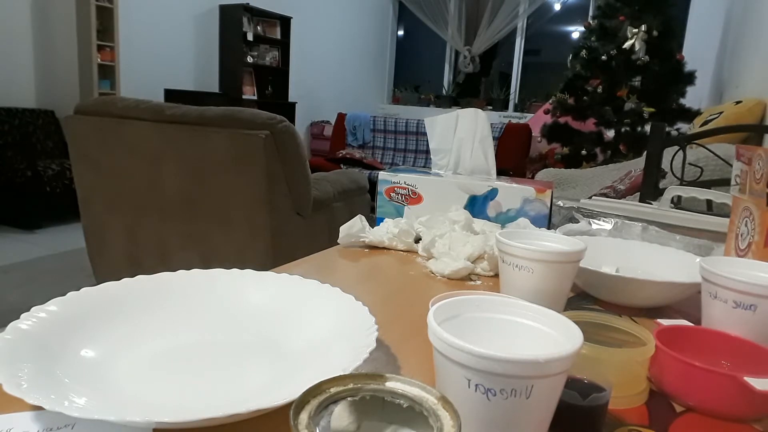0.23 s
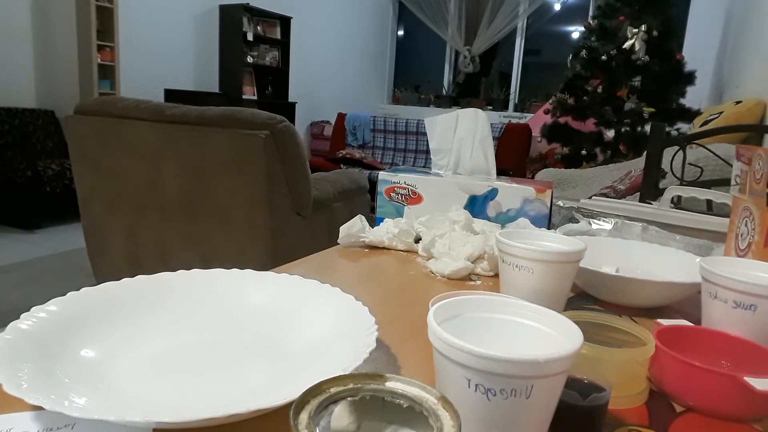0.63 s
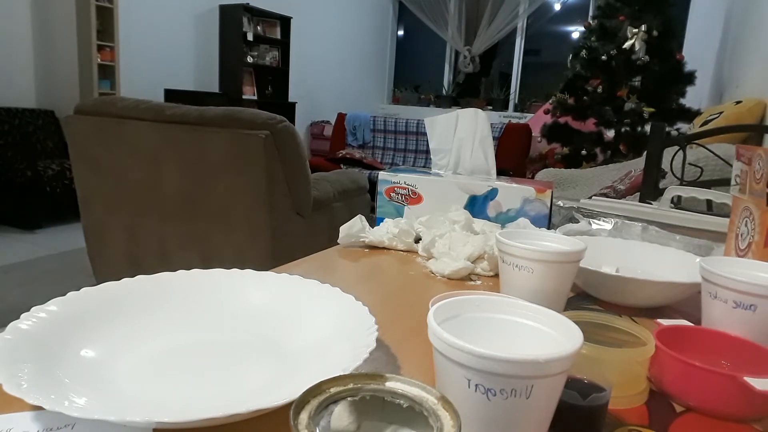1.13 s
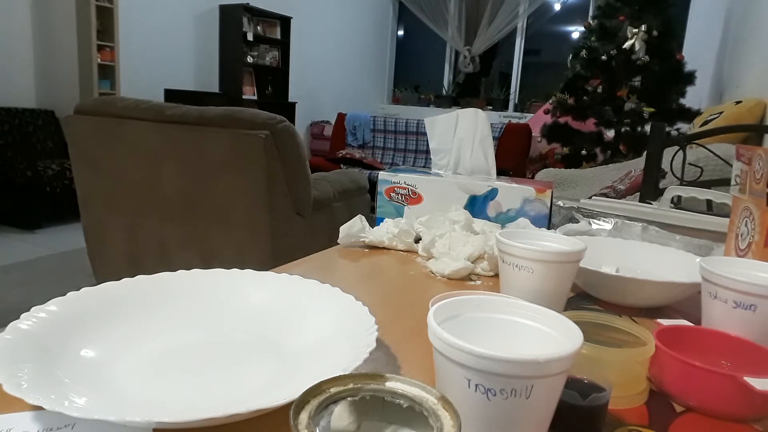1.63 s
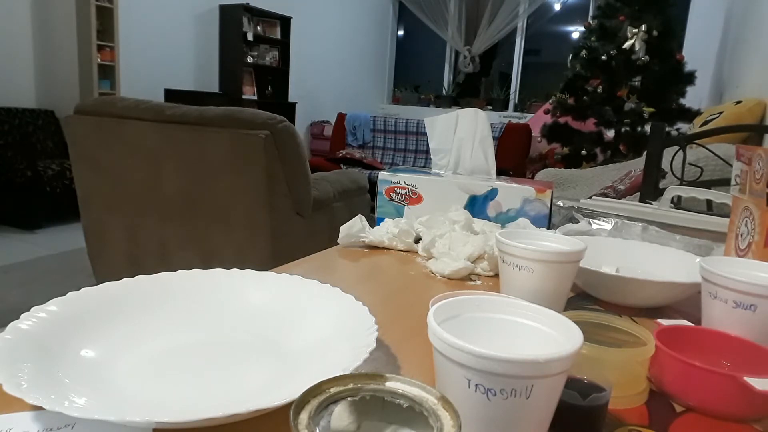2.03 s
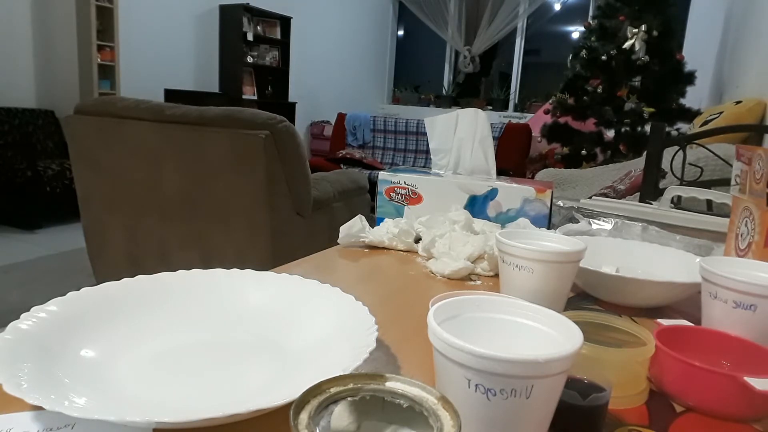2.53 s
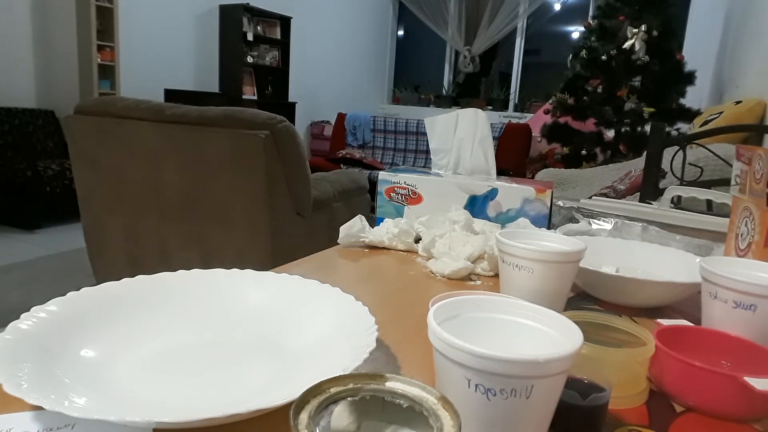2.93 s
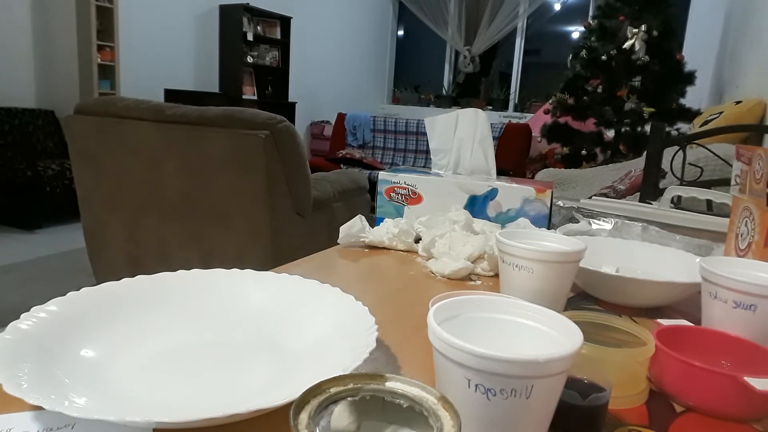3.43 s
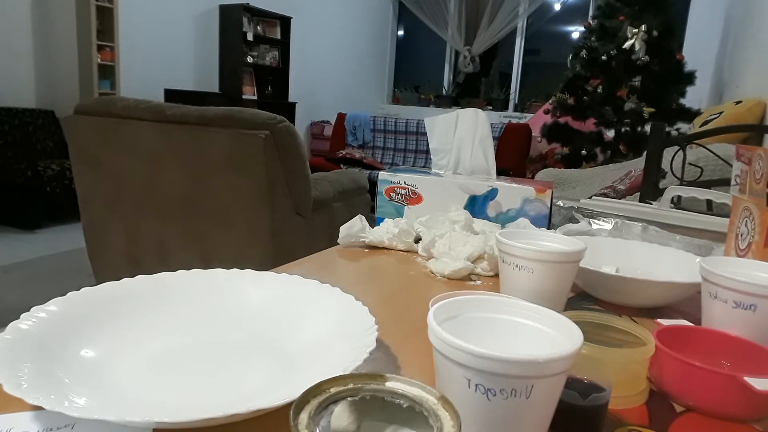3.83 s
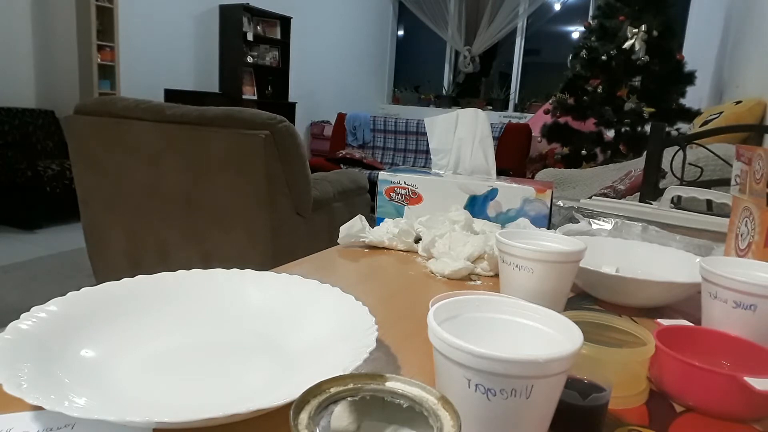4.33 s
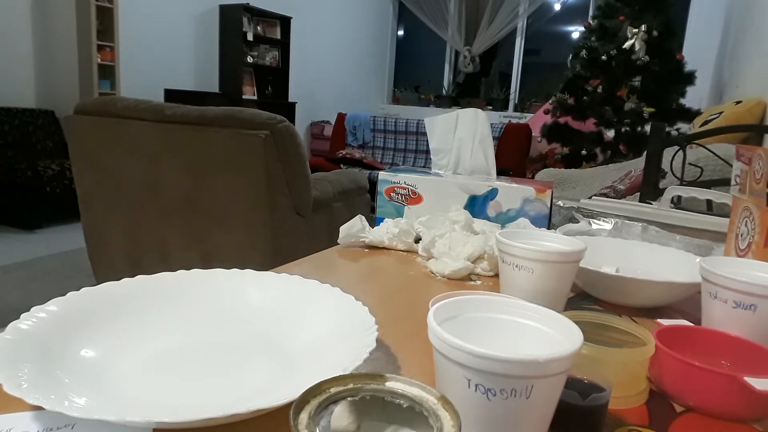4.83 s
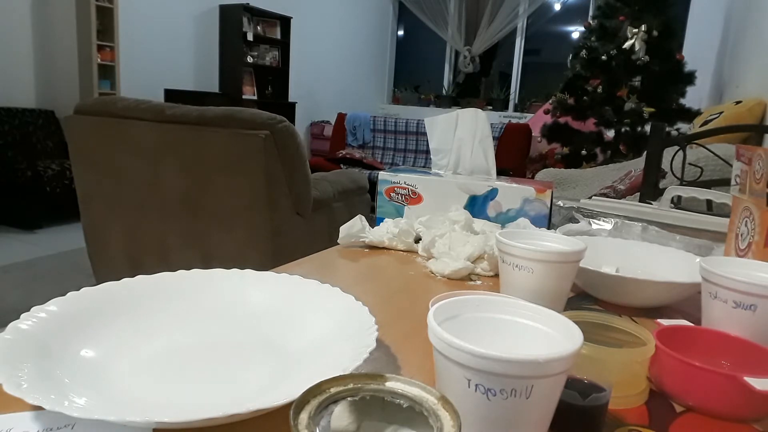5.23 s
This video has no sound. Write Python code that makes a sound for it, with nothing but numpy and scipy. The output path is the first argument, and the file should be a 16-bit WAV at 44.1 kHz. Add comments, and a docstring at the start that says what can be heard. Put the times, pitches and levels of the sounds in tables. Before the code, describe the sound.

In a quiet, hard-floored living room with low ventilation rumble, faint squeaks and small metal latch clicks with soft thuds come first. A door then slams sharply, booming through the room. Slippered steps follow, slapping and scuffing slowly to the end, with one small hollow knock close by. A stationary phone on a table hears the door and walker at a distance, in mono with slight hiss.

```python
"""A door is slammed across a hard-floored living room: dulling blows, a panel of damped modes and a boom.
Before it, steel latch parts chatter and ring and soft thuds fall; a small hollow thing knocks after it.
Slippers shuffle: each step is slaps, made of tiny contacts, and scuffs, made of slips through a resonance.
Faint squeaks stick and slip, and clothes rustle as fluttering noise. The room answers each contact with
reflections and a tail, over ventilation: a noise rumble with wavering tones."""
import sys
import numpy as np
from scipy import signal
from scipy.fft import rfft, irfft, next_fast_len
from scipy.io import wavfile
from scipy.ndimage import map_coordinates

SR = 44100
rng = np.random.default_rng(int(sys.argv[2]) if len(sys.argv) > 2 else 0)


def bounce(signal):
    """Save signal as a 16-bit WAV file at the path given by the first command-line argument."""
    frames = np.transpose(np.atleast_2d(signal))
    limited = np.clip(frames, -1, 1)
    pcm = np.round(limited * 32767).astype(np.int16)
    wavfile.write(sys.argv[1], SR, pcm)


N = 241957  # length of the scene in samples
T = np.arange(SR) / SR  # each short sound is built on one second of time [s]
HZ = np.fft.rfftfreq(SR, 1 / SR)

# Steps, one foot rolling down slowly and the other almost flat:
# (heel lands [s], sole lands [s], skim before the heel [s], drag after the sole [s],
#  relative heel level [dB], relative sole level [dB], slide level [dB], drag level [dB],
#  slap brightness [dB per octave])
FOOTSTEPS = [(2.211, 2.349, 0.0033, 0.099, -37, -40, -61.5, -54.5, 2),
             (2.772, 2.837, 0.01, 0.14, -55, -31, -57, -53.5, -0.3),
             (3.256, 3.383, 0.1, 0.15, -36.5, -27.5, -47.5, -56.5, 2.5),
             (3.873, 3.909, 0.11, 0.12, -41.5, -30, -53, -50.5, 0.9),
             (4.289, 4.412, 0.071, 0.15, -30.5, -31.5, -47.5, -49, 2.3),
             (4.944, 4.977, 0.057, 0.15, -40.5, -33.5, -50.5, -47.5, -2.5),
             (5.412, 5.54, 0.01, 0.13, -40.5, -35, -54.5, -48, 0.5)]
# Colour of a soft heavy bump: (frequency [Hz], relative level [dB])
BUMP_COLOUR = [(29, -43), (50, -18), (81, -5), (199, -3.5), (257, -8.5), (377, -1), (447, -16.5),
               (578, -15.5), (630, -18), (1500, -27), (1950, -56), (3300, -120)]
# Colour of the slipper sole's rub, also lent to the fabric: (frequency [Hz], relative level [dB])
SOLE_COLOUR = [(310, -22.5), (520, -3), (739, -2.5), (1180, 1), (1580, -2.5), (2150, -2.5), (2310, -2.5),
               (3240, -4.5), (3670, -6), (4000, -7), (6180, -13.5), (9560, -13.5), (10900, -23),
               (15000, -21.5)]
LIGHT_HZ, LOADED_HZ, LIFTING_HZ = 2020, 1070, 2600  # sole resonance: first touch, full weight, lift-off


def amp(db):
    """Turn decibels into a linear gain."""
    return 10 ** (np.asarray(db) / 20)


def unit(x):
    """Scale to an rms of 1."""
    return x / np.sqrt(np.mean(x ** 2) + 1e-20)


def unit_energy(x):
    """Scale to an energy of 1."""
    return x / np.sqrt(np.sum(x ** 2) + 1e-20)


def along(points, hz):
    """Read a curve of (Hz, value) points on a log frequency axis."""
    point_hz, values = np.transpose(points)
    return np.interp(np.log(hz + 1), np.log(point_hz + 1), values)


def fade(t60):
    """An exponential decay of 60 dB in t60 seconds."""
    return np.exp(-np.log(1000) * T / np.maximum(t60, 1e-4))


def wobble(rate):
    """A smooth random curve through rate knots a second."""
    knots = rng.standard_normal(int(N * rate / SR) + 4)
    return map_coordinates(knots, [np.arange(N) * rate / SR])


def add(track, s, sound):
    """Mix a sound into the track at time s."""
    start = round(s * SR)
    part = sound[:max(N - start, 0)]
    track[start:start + len(part)] += part


def colour(spectrum, bright=0):
    """A spectrum in dB, tilted about 2 kHz by bright dB per octave: harder contact is brighter."""
    return along(spectrum, HZ) + bright * np.log2(np.clip(HZ, 400, 9000) / 2000)


def pulse(colour_db):
    """The causal click that has this colour, folded to minimum phase; energy 1."""
    cepstrum = irfft(np.log(amp(colour_db - colour_db.max()) + 1e-6), SR)
    cepstrum[1:SR // 2] *= 2
    cepstrum[SR // 2 + 1:] = 0
    return unit_energy(irfft(np.exp(rfft(cepstrum)), SR))


def ring(modes, t60_at_1k, slope):
    """Damped modes, the higher ones shorter, at slightly new strengths for each blow; energy 1."""
    total = np.zeros(SR)
    for hz, db in modes:
        decay = fade(t60_at_1k * (hz / 1000) ** -slope)
        total += amp(db + rng.normal(0, 1.0)) * decay * np.sin(2 * np.pi * (hz * T + rng.random()))
    return unit_energy(total)


def in_room(sound, early_db, early_t60, direct):
    """Direct sound, sparse early reflections and a diffuse tail, drawn anew for each sound."""
    # Decay of the room: (frequency [Hz], 60 dB decay time [s])
    room_decay = [(60, 0.84), (150, 1), (300, 0.78), (1000, 0.72), (3000, 0.63), (5500, 0.64), (9000, 0.43),
                  (14000, 0.28)]
    hz, t, z = signal.stft(rng.standard_normal(SR), SR, nperseg=256)
    decay = np.exp(-np.log(1000) * t / along(room_decay, hz)[:, None])
    tail = signal.istft(z * decay, SR, nperseg=256)[1][:SR]
    tail = unit_energy(tail * (1 - fade(0.037)))  # the tail builds up gradually
    early = unit_energy(rng.standard_normal(SR) * (rng.random(SR) < .08) * fade(early_t60))
    early[0] += direct
    response = unit_energy(tail + amp(early_db) * unit_energy(early))
    return signal.fftconvolve(sound, response)[:SR]


def strike(sound, db):
    """Scale a hit by its first 1/80 s so that its attack peaks near db."""
    attack = sound[:SR // 80]
    return amp(db - 10) * sound / np.sqrt(np.mean(attack ** 2))  # allows 10 dB from rms to peak


def noise(spectrum):
    """Steady noise of rms 1 with this spectrum."""
    shape = amp(along(spectrum, np.fft.rfftfreq(N, 1 / SR)))
    return unit(irfft(rfft(rng.standard_normal(N)) * shape, N))


def door(ring_level_db=-23, early_db=-2, boom_db=-3, count=3):
    """The leaf lands along the frame in quick, ever duller blows; its panel rings and the room booms."""
    # The leaf's broad knock: (frequency [Hz], relative level [dB])
    leaf_colour = [(140, -48), (230, -14), (320, -3.5), (483, -7.5), (880, -3.5), (967, -8), (1110, -3.5),
                   (1820, -8), (2230, -9), (2610, -16), (3260, -9), (4330, -29), (6430, -58), (6960, -43),
                   (10000, -26.5), (13000, -68), (22000, -120)]
    # The leaf's ringing modes: (frequency [Hz], relative level [dB])
    panel_modes = [(323.0, -37.5), (425.3, -38.5), (586.8, -41), (759.0, -56), (866.7, -42), (909.8, -53),
                   (1050, -48), (1114, -44), (1233, -49), (1480, -47), (1545, -47), (1615, -65),
                   (1642, -42), (1674, -47), (1739, -50), (1927, -53), (2105, -52), (2342, -54),
                   (2396, -55), (2977, -50), (3241, -59), (3354, -64), (3612, -44.5), (3876, -63)]
    # The air that the leaf pushes into the room: (frequency [Hz], relative level [dB])
    boom_colour = [(32, -31), (52, -14), (64, 3), (81, -0.5), (113, -5.5), (145, 6), (178, -11.5),
                   (230, 4.5), (300, -42), (510, -120)]
    slam_s, slam_db, slam_bright = 1.809, -16.5, 0.47  # first blow: s, dB, dB per octave
    gap_s, loss_db, dulling = 0.0076, 2, 1.0  # per further blow: s later, dB weaker, dB per octave duller
    out = np.zeros(N)
    for k in range(count):
        blow = pulse(colour(leaf_colour, slam_bright - k * dulling))
        blow = in_room(blow, early_db, early_t60=0.13, direct=0.044)
        add(out, slam_s + k * gap_s, strike(blow, slam_db - k * loss_db))
    swell = 1 - fade(0.049)  # the blow takes a moment to spread through the panel
    add(out, slam_s, swell * strike(ring(panel_modes, t60_at_1k=0.7, slope=0.042), ring_level_db))
    boom = in_room(pulse(colour(boom_colour)), early_db=-4, early_t60=0.33, direct=.05)
    add(out, slam_s, amp(boom_db) * unit_energy(boom))
    return out


def latch(early_db=0):
    """Steel parts chatter in the lock; harder strikes are brighter and leave more of a thin ring."""
    # Handle and latch contacts: (time [s], level [dB], chatter length [s])
    latch_contacts = [(1.196, -45, 0.03), (1.463, -48.5, 0.092), (1.533, -49.5, 0.036), (1.549, -40, 0.017),
                      (1.568, -37.5, 0.0084), (1.792, -24, 0.032), (1.8068, -20.5, 0.0098)]
    # A latch click: (frequency [Hz], relative level [dB])
    steel_colour = [(180, -45), (300, 3.5), (907, -9), (1590, -2), (2210, 0.5), (3130, -2.5), (3400, -7),
                    (3690, 0), (4720, -9.5), (5300, -9), (5950, -10), (6680, -11), (8560, -10.5),
                    (11300, -28.5), (15500, -29)]
    # The lock's ringing modes: (frequency [Hz], relative level [dB])
    lock_modes = [(4587, -66), (5383, -58), (5825, -63), (6105, -69), (6842, -51), (6977, -55), (7036, -63),
                  (8355, -72)]
    firm_db, firm_ring_db = -34, -22  # a firm contact: its level, and its ring relative to the click
    brightens, ring_grows = 0.19, 0.41  # per dB harder than that: dB per octave brighter, dB more ring
    out = np.zeros(N)
    for s, db, spread in latch_contacts:
        force_db = db - firm_db
        click = chatter(colour(steel_colour, brightens * force_db), spread)
        click = in_room(click, early_db, early_t60=0.092, direct=0.18)
        ring_gain = amp(firm_ring_db + ring_grows * force_db)
        ringing = ring_gain * ring(lock_modes, t60_at_1k=0.73, slope=0.17)
        add(out, s, strike(unit_energy(click) + ringing, db))
    return out


def chatter(colour_db, spread, follow_db=0):
    """Two surfaces meet: one contact, then a run of tiny ones that dies within spread seconds."""
    contacts = rng.standard_normal(SR) * (rng.random(SR) < .3) * fade(spread)
    contacts = amp(follow_db) * unit_energy(contacts)
    contacts[0] += 1
    return unit_energy(signal.fftconvolve(contacts, pulse(colour_db))[:SR])


def slaps(level_db=-2, weight_db=-12, early_db=1.5):
    """Heel, then sole smack the hard floor, with a soft thump from the walker's weight."""
    # A slipper slap: (frequency [Hz], relative level [dB])
    slap_colour = [(240, -14), (400, -14.5), (784, -11), (1070, 5), (1300, -4), (1910, 0), (3910, -1.5),
                   (4290, -4), (4630, -7), (9350, -14.5), (10600, -22), (15500, -32)]
    out = np.zeros(N)
    for heel_s, sole_s, _, _, heel_db, sole_db, _, _, bright in FOOTSTEPS:
        for s, db in (heel_s, heel_db), (sole_s, sole_db):
            smack = chatter(colour(slap_colour, bright), spread=0.022, follow_db=-1)
            thump = amp(weight_db) * pulse(colour(BUMP_COLOUR))
            contact = in_room(smack + thump, early_db, early_t60=0.089, direct=0.14)
            add(out, s, strike(contact, db + level_db))
    return out


def scuffs(skim_rise_db=-3, slide_rise_db=-2, drag_rise_db=1.0):
    """Each foot skims, slides as the weight comes on (resonance falls), drags to lift-off (it rises)."""
    # One low scrape between steps: (time [s], length [s], level [dB], resonance [Hz])
    dull_scrape = (2.955, 0.08, -59.5, 660)
    skim_db = -9.5  # relative to the slide
    skim_bright, slide_bright, drag_bright = 0.31, -0.62, 0.53  # tilt [dB per octave] before the glide's own
    out = np.zeros(N)
    for heel_s, sole_s, skim_s, drag_s, _, _, slide_db, drag_db, _ in FOOTSTEPS:
        skim = scuff(skim_s, slide_db + skim_db, LIGHT_HZ, LIGHT_HZ, skim_bright, skim_rise_db)
        add(out, heel_s - skim_s, skim)
        slide = scuff(sole_s - heel_s, slide_db, LIGHT_HZ, LOADED_HZ, slide_bright, slide_rise_db)
        add(out, heel_s, slide)
        drag = scuff(drag_s, drag_db, LOADED_HZ, LIFTING_HZ, drag_bright, drag_rise_db)
        add(out, sole_s, drag)
    s, length, db, hz = dull_scrape
    add(out, s, scuff(length, db, hz, hz, tilt=-2.4, rise_db=0))
    return out


def scuff(length, db, from_hz, to_hz, tilt, rise_db, grain_rate=2200, spread_db=3, clump_db=2.5,
          resonance_db=5, width_octaves=0.21, swell=0.057, count=4):
    """A sole drags on grit: clumps of tiny slips, coloured by the sole's gliding resonance."""
    brightens = 2.5  # more tilt [dB per octave] for each octave that the resonance rises
    progress = np.minimum(T / length, 1)
    pressure = np.abs(np.sin(np.pi * progress)) ** swell * (T < length)
    pressure *= amp(rise_db * progress + clump_db * wobble(117.0)[:SR])
    slips = (rng.random(SR) < grain_rate / SR) * rng.choice([-1, 1], SR)
    slips = slips * amp(spread_db * np.minimum(rng.exponential(size=SR), 4))
    rub = np.zeros(SR)
    # the glide crossfades through count fixed resonances
    for k, hz in enumerate(np.geomspace(from_hz, to_hz, count)):
        share = np.maximum(1 - np.abs(progress * (count - 1) - k), 0)
        resonance = resonance_db / (1 + (np.log2((HZ + 1) / hz) / width_octaves) ** 2)
        bright = tilt + brightens * np.log2(hz / LIGHT_HZ)
        grain = pulse(colour(SOLE_COLOUR, bright) + resonance)
        rub += signal.fftconvolve(slips * pressure * share, grain)[:SR]
    rub = in_room(rub, early_db=3.5, early_t60=0.028, direct=0.98)
    return amp(db) * np.sqrt(length * SR) * unit_energy(rub)


def knock():
    """A small hollow thing touches down nearby: coloured clicks with a strong direct sound."""
    # Touches: (time [s], level [dB])
    touches = [(2.504, -36.5), (2.5064, -34)]
    # The hollow body: (frequency [Hz], relative level [dB])
    hollow_colour = [(88, -55), (150, -2), (457, -3), (860, -4), (1120, 2), (1660, -9), (3320, -25),
                     (3620, -36), (5000, -37), (6500, -85), (11000, -120)]
    out = np.zeros(N)
    for s, db in touches:
        touch = in_room(pulse(colour(hollow_colour)), early_db=4.0, early_t60=0.051, direct=2.1)
        add(out, s, strike(touch, db))
    return out


def thuds(early_db=-5):
    """Soft heavy bumps, far off: dull clicks with most of their energy in the room's tail."""
    # Bumps: (time [s], level [dB])
    bump_hits = [(1.199, -39), (1.216, -42), (1.277, -45), (1.551, -44.5)]
    out = np.zeros(N)
    for s, db in bump_hits:
        thud = in_room(pulse(colour(BUMP_COLOUR)), early_db, early_t60=0.17, direct=0.4)
        add(out, s, strike(thud, db))
    return out


def squeaks(slip_hz=900, jitter=.6):
    """Something rubbed sticks and slips at an uneven rate around slip_hz into a high resonance."""
    # Faint squeaks: (time [s], length [s], level [dB])
    squeak_times = [(0.853, 0.022, -60.5), (0.957, 0.014, -72), (4.858, 0.033, -61)]
    # Colour of the squeaks: (frequency [Hz], relative level [dB])
    squeak_colour = [(1470, -23), (2500, -8), (3050, -23), (3380, -10), (3550, 3.5), (3750, -13),
                     (5380, -18), (5830, -18.5), (9000, -34), (11700, -50), (19800, -120)]
    out = np.zeros(N)
    for s, length, db in squeak_times:
        cycles = np.floor(slip_hz * np.cumsum(np.exp(jitter * wobble(800)[:SR])) / SR)
        swell = np.sin(np.pi * np.minimum(T / length, 1))
        slips = np.diff(cycles, prepend=0) * swell  # one slip as each cycle completes
        squeak = signal.fftconvolve(slips, pulse(colour(squeak_colour)))[:SR]
        squeak = in_room(squeak, early_db=-1.0, early_t60=0.046, direct=0.17)
        add(out, s, amp(db) * np.sqrt(length * SR) * unit_energy(squeak))
    return out


def clothes(level_db=-72, bright=2.4, flutter_db=2, lead_s=0.39):
    """Fabric rustles faintly: bright fluttering noise that fades in just before the first step."""
    first_step_s = FOOTSTEPS[0][0]
    moving = np.clip((np.arange(N) / SR - first_step_s) / lead_s + 1, 0, 1)
    rustle = noise(np.column_stack([HZ, colour(SOLE_COLOUR, bright)]))
    return moving * amp(level_db + flutter_db * wobble(12)) * rustle


def ventilation(air_db=-59, drone_db=-1.5, waver_db=3.0, drift=0.81):
    """Steady noise rumble with low tones that waver in level and phase (drift in radians)."""
    # Rumble: (frequency [Hz], relative level [dB])
    air_colour = [(16, -56), (28, -22), (42, -15.5), (55, -10), (80, -12.5), (113, -5), (193, -5),
                  (274, -5), (329, -7), (396, -5), (423, -16), (610, -15.5), (697, -16.5), (880, -16.5),
                  (1500, -35.5), (1950, -65), (3300, -120)]
    # Wavering tones: (frequency [Hz], level before drone_db [dB rms])
    drone_tones = [(75.4, -92), (91.5, -68), (145.3, -68.5), (188.4, -64), (301.5, -68.5), (328.4, -64),
                   (629.8, -81), (656.8, -78)]
    t = np.arange(N) / SR
    drone = np.zeros(N)
    for hz, db in drone_tones:
        level = amp(db + waver_db * wobble(4.79)) * np.sqrt(2)  # rms to peak
        drone += level * np.sin(2 * np.pi * hz * t + drift * wobble(9))
    return amp(air_db) * noise(air_colour) + amp(drone_db) * drone


def scene():
    """Sum the door, the walker, the small contacts and the background into one channel."""
    contacts = door() + latch() + slaps() + scuffs() + knock() + thuds() + squeaks()
    return (contacts + clothes() + ventilation())[None]


def record(dry):
    """The phone adds its own steady hiss and keeps nothing above its band limit."""
    # Hiss: (frequency [Hz], relative level [dB])
    hiss_colour = [(760, -18), (1300, -3), (1760, -6.5), (2700, -8.5), (7290, -18.5), (9770, -18.5),
                   (12800, -21), (14500, -13), (15800, -18)]
    hiss_db, top_hz = -72, 15850  # hiss level before the band limit; band limit
    size = next_fast_len(N + SR // 2)
    hissy = dry + amp(hiss_db) * noise(hiss_colour)
    passband = np.fft.rfftfreq(size, 1 / SR) < top_hz
    return irfft(rfft(hissy, size) * passband, size)[:, :N]


dry = scene()
out = record(dry)
bounce(out)
```